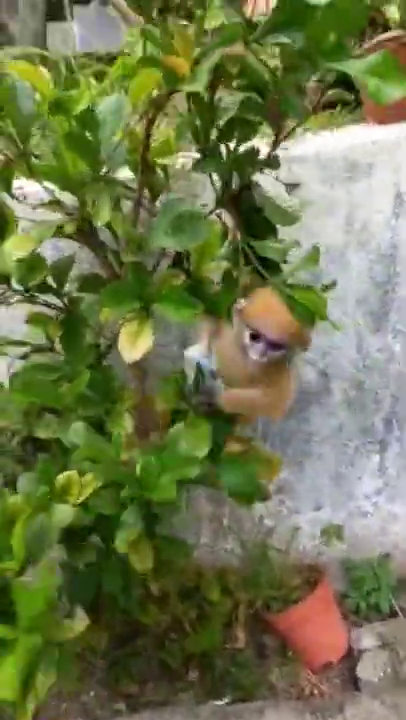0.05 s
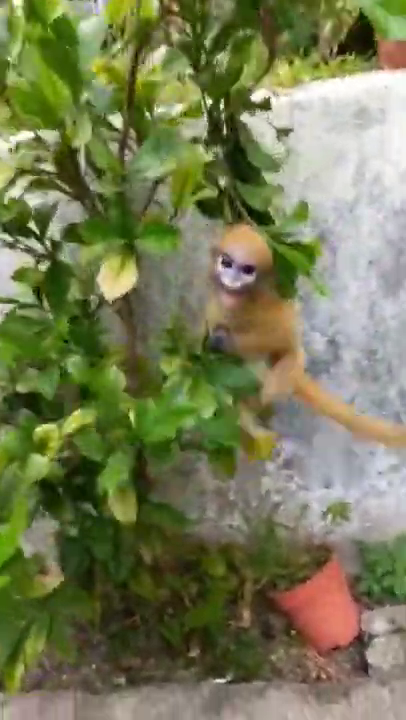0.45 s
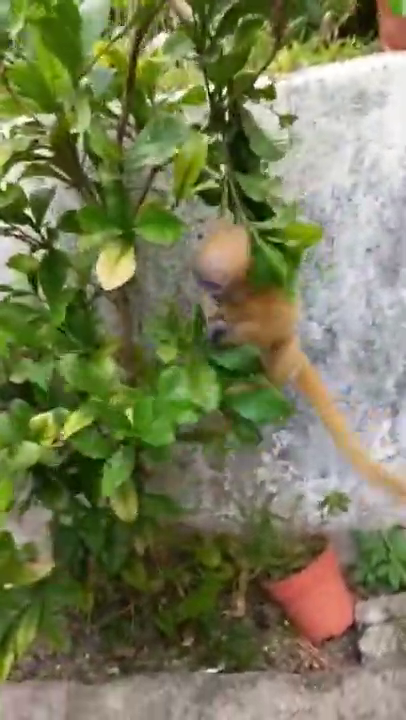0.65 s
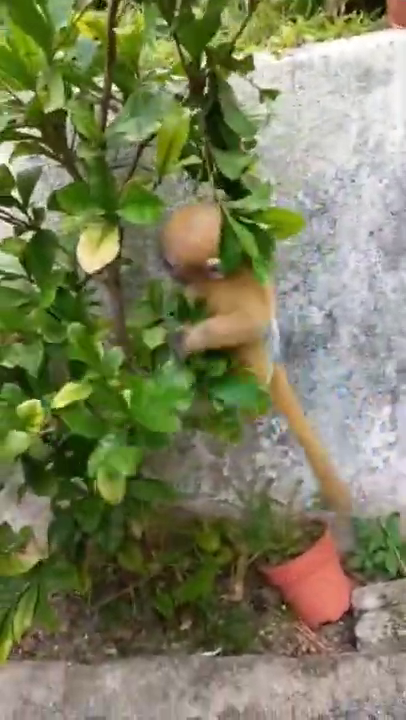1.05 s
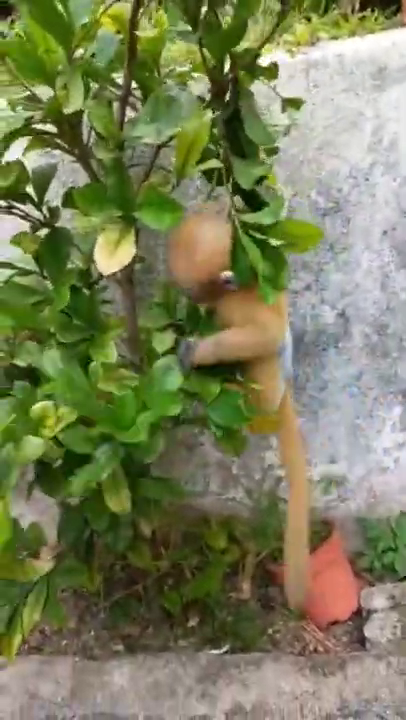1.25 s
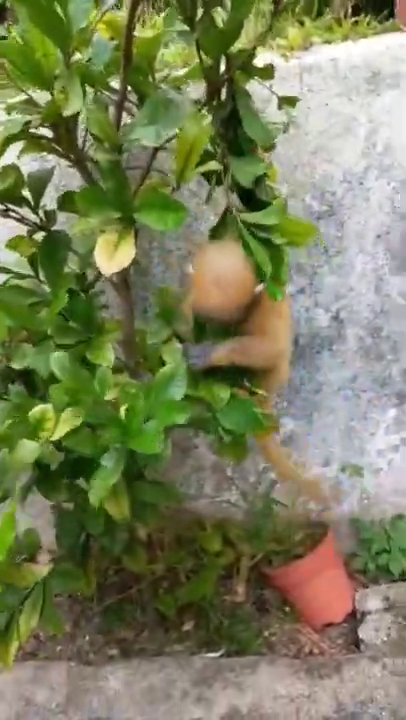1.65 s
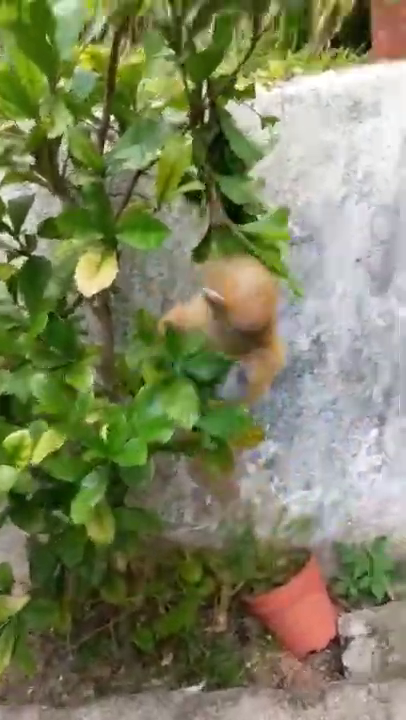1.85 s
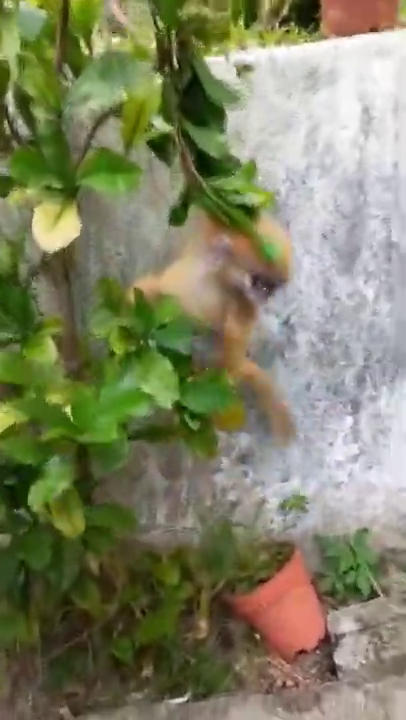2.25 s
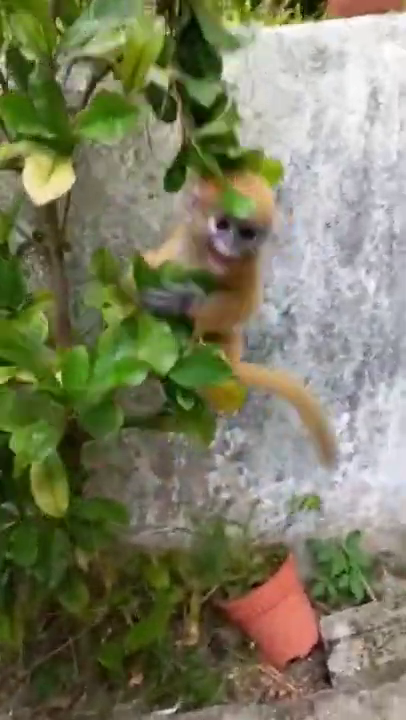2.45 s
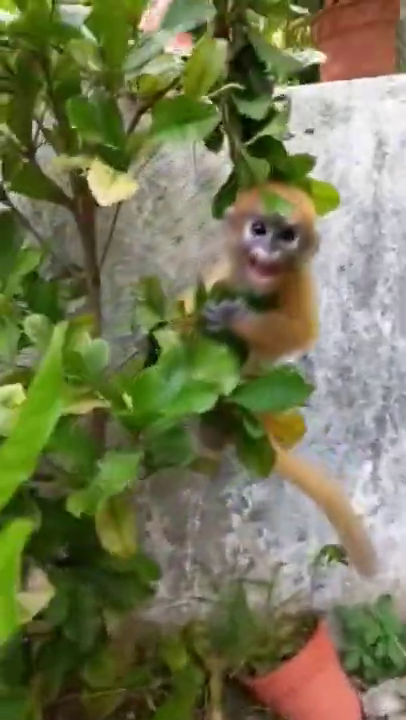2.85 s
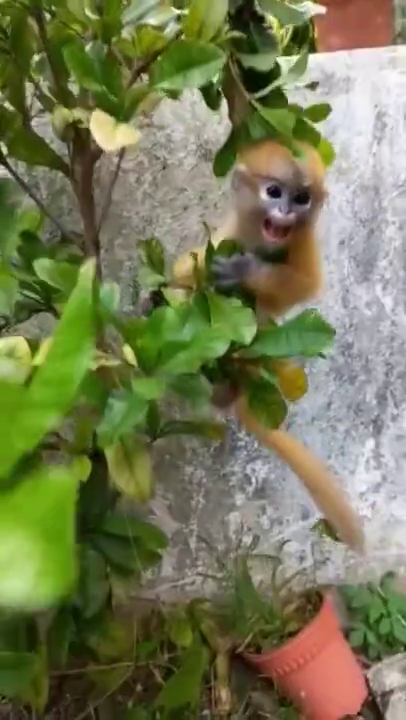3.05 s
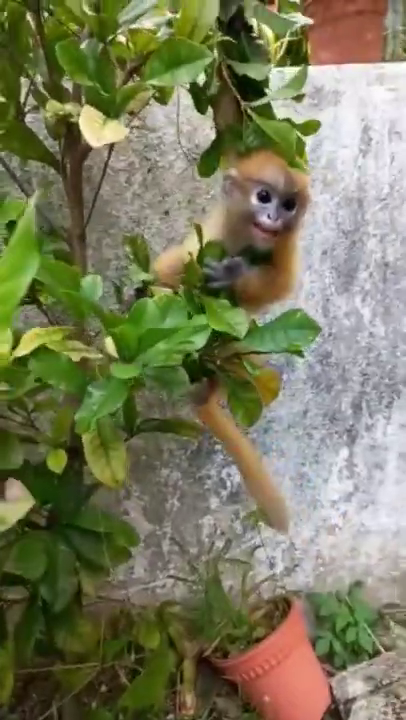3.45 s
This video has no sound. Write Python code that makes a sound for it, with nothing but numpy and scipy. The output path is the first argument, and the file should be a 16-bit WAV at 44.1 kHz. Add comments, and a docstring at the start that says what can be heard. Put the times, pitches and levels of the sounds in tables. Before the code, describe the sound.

A young monkey cries three times, quavering whines breaking into harsh shrieks over faint insects.

```python
"""Over far insect hiss and rustling leaves, a young monkey in a bush by a garden wall gives a clear whine
that rises, quavers and breaks into a harsh shriek and short yelps. One low grunt opens with a click.
A second cry runs like the first; the third stays a whine while air rumbles on the moving microphone,
and a faint yelp comes last. The voice is a source and filter: vocal-fold pulses and rasp excite
resonances of throat and mouth. The foliage scatters the cries, and the wall and ground reflect them."""
import sys
import numpy as np
from scipy import signal
from scipy.fft import rfft, irfft
from scipy.io import wavfile
from scipy.ndimage import uniform_filter1d

SR = 44100
rng = np.random.default_rng(int(sys.argv[2]) if len(sys.argv) > 2 else 0)


def wav_record(signal):
    """Record a signal, one row per channel, as 16-bit PCM in the file named by sys.argv[1]."""
    frames = np.transpose(np.atleast_2d(signal))
    bounded = np.clip(frames, -1, 1)
    # unit amplitude maps onto the largest positive 16-bit level
    quanta = np.round(bounded * 32767).astype(np.int16)
    wavfile.write(sys.argv[1], SR, quanta)


N = 154350
T = np.arange(N) / SR

# Spectral envelopes: f/Hz, relative level/dB
AIR_SPECTRUM = [(30, 13.5), (200, 9.5), (450, -9), (600, 3), (800, -18.5), (1450, -3), (2000, -17),
                (4000, -7.5), (6000, -18), (10000, -34), (15000, -23)]
INSECT_SPECTRUM = [(6300, -19), (7000, 30), (7600, 18.5), (8600, -64), (14200, 13)]
RUMBLE_SPECTRUM = [(25, -58), (42, -25), (62, -2), (110, -1), (160, -9), (250, -18), (400, -31),
                   (900, -45.5)]
RUSTLE_SPECTRUM = [(300, -1.5), (800, 2.5), (1400, -1.5), (3000, -7.5), (6000, -3), (10000, -5.5),
                   (15000, -2.5)]
GRUNT_SPECTRUM = [(120, -9), (530, 12), (800, -11.5), (1900, -17), (3000, -3), (4500, -16.5)]
# Frequency responses of foliage, throat, mouth and left port against right: f/Hz, gain/dB
SCATTER_RESPONSE = [(1000, -6), (3000, 3.5), (6000, 6), (12000, 8.5)]
THROAT_RESPONSE = [(500, 1.5), (900, -1), (1250, 2), (1750, 10.5), (2100, 13), (2500, 14), (2900, 5),
                   (3400, 3), (4100, -10), (5500, -42)]
MOUTH_RESPONSE = [(1500, -28.5), (3300, -21.5), (4300, -9), (5500, -4.5), (6700, -7.5), (7700, -2),
                  (8500, -4.5), (9700, -4), (11000, -1.5), (13000, 1), (15500, -1)]
LEFT_RESPONSE = [(100, 7.5), (1000, 1), (2500, -2.5), (5500, 3.5), (8000, 0), (10500, -3), (12500, -11.5),
                 (15000, -18.5)]
# Envelopes of air on the microphone, leaf rustle and sound by way of the foliage: t/s, relative level/dB
RUMBLE_LEVEL = [(0, -67), (.83, -49.5), (1.6, -66.5), (2.43, -52), (2.74, -37), (2.9, -50), (3.5, -55.5)]
RUSTLE_LEVEL = [(0, -55), (.8, -46), (1.05, -57.5), (1.6, -62), (2.7, -47.5), (3.4, -57)]
SCATTER_LEVEL = [(.4, -10.5), (.7, -9), (2.3, -5.5), (2.75, -16), (3.1, -10.5)]
# Soft bumps on the microphone: t/s, relative peak level/dB
HANDLING_BUMPS = [(.75, -63), (0.844, -48), (1.46, -53), (2.434, -46), (2.691, -35.5), (2.78, -31),
                  (3.111, -38.5), (3.298, -42.5)]
# The sharp click that opens the grunt, then two leaf ticks: t/s, peak level/dB
CLICKS = [(0.919, -35), (1.072, -46.5), (2.6, -43.5)]
# Earlier arrival at the left port: t/s, lead/ms
LEFT_LEAD = [(.5, 0.099), (2.2, 0.091), (2.9, 0.16)]
# Course of the grunt: t/s, f/Hz, level/dB
GRUNT_CONTOUR = [(.916, 137.8, -48), (0.936, 192, -41.5), (0.95, 273, -36.5), (0.968, 327, -47.5),
                 (1.001, 286, -63)]
# Yelps: onset t/s, duration/s, lowest f/Hz, roughness, throat level/dB, treble level/dB
YELP_EVENTS = [(0.674, 0.033, 1763, 1.09, -44, -22.5), (0.737, .032, 1970, 0.95, -50, -25),
               (0.817, 0.017, 2293, 1, -40, -25), (2.419, 0.011, 2010, 0.8, -36.5, -23.5),
               (2.477, 0.026, 1527, 0.77, -35, -23), (2.528, 0.022, 1697, 0.86, -43, -62),
               (3.471, 0.021, 687, 0.4, -47.5, -59)]
# Cries: t/s, f/Hz, quaver depth as a share of f, roughness (full at 1), throat level/dB, treble level/dB
FIRST_CRY = [(.07, 733, 0.0041, 0.3, -62, -62), (0.107, 674, 0.0069, 0.05, -47.5, -61),
             (0.178, 749, 0.0031, 0, -38.5, -48.5), (0.256, 813.6, 0.02, 0.13, -34.5, -45),
             (0.377, 874.5, 0.044, 0.21, -30, -36), (0.462, 923, 0.033, 0.09, -30.5, -26.5),
             (.508, 986.7, .03, 0.25, -32.5, -21.5), (.535, 1307, 0.069, 0.35, -36.5, -22.5),
             (.547, 1711, 0.088, 0, -34, -19), (0.559, 1951, 0.085, 0.42, -25.5, -20),
             (.567, 1551, .14, .95, -37, -27.5), (.58, 1944, 0.1273, 1, -30, -17),
             (.598, 2000, .18, 0.88, -33, -16.5), (0.629, 1907, .14, 1.03, -34.5, -26),
             (0.653, 2280, 0.127, 1.17, -37.5, -20.5)]
SECOND_CRY = [(1.665, 772, 0.0066, 0.093, -58.5, -64), (1.723, 764, 0.0047, 0.21, -46, -53.5),
              (1.812, 826, 0.018, 0.13, -49.5, -55), (1.902, 819.4, 0.011, 0.087, -41, -44.5),
              (2.017, 902, 0.039, 0.39, -39, -48), (2.035, 921, .045, 0.38, -38.5, -29),
              (2.08, 1048, .06, 0.25, -35.5, -37), (2.111, 1084, .07, 0.25, -34, -27.5),
              (2.127, 1250, .08, 0.37, -38.5, -25.5), (2.136, 1719, .15, 0.86, -40.5, -31),
              (2.17, 1618, .2, 0.69, -32, -25.5), (2.2, 1830, .22, 0.91, -34, -27),
              (2.235, 1742, .22, 0.61, -35, -25), (2.299, 1880, .18, 0.92, -34.5, -25.5),
              (2.373, 2084, .09, 0.3, -32.5, -25)]
THIRD_CRY = [(2.665, 768, 0.0041, 0.33, -59, -60), (2.7, 792, 0.0037, 0.24, -41.5, -34),
             (2.75, 824, 0.016, 0.062, -36, -28), (2.803, 908, 0.046, 0.086, -33, -26.5),
             (2.871, 886.6, 0.053, 0.096, -32.5, -22), (2.93, 980, 0.068, 0.26, -35, -22),
             (2.999, 977, 0.051, 0.26, -34.5, -25), (3.067, 1038, 0.0578, 0.25, -37.5, -22.5),
             (3.169, 1051, 0.092, 0.16, -35, -25.5), (3.225, 1001, 0.091, 0.48, -36, -26),
             (3.256, 984, 0.073, 1, -54, -50)]
# Manner of each cry: t/s of one pitch trough, quaver rate there/Hz, its rise/(Hz/s),
# mouth resonance f/Hz, its gain/dB, treble tilt/(dB/octave), upper throat resonance gain/dB
CRY_MANNERS = [(.569, 15.7, 12.5, 5570, -1.5, -2.5, 0), (2.236, 15.4, 9, 4090, 7.5, 0.5, -2.5),
               (2.968, 14.8, -0.5, 5280, 4.5, 3, -8)]

CUTOFF_HZ = 15550


def from_db(db):
    """Amplitude ratio of a level: 20 dB to a factor of ten."""
    return 10 ** (np.asarray(db) / 20)


def rms_one(x):
    """Normalisation to unit rms."""
    return x / np.sqrt(np.mean(x ** 2) + 1e-20)


def hold_level(x):
    """Division by the running rms holds the level steady."""
    return x / np.sqrt(np.abs(uniform_filter1d(x * x, size=500)) + 1e-9)


def curves(rows, t):
    """Linear interpolation of each column in time."""
    times, *columns = np.transpose(rows)
    return [np.interp(t, times, column) for column in columns]


def colour(x, points):
    """Minimum-phase filtering: folding the cepstrum makes an outline (f/Hz, gain/dB) causal."""
    hz, db = np.transpose(points)
    size = 4096
    f = np.maximum(np.arange(size // 2 + 1) * SR / size, 1)
    bass_rolloff_db = 40 * np.log10(np.minimum(f / hz[0], 1) + .01)
    gain = from_db(np.interp(np.log(f), np.log(hz), db) + bass_rolloff_db)
    cepstrum = irfft(np.log(gain))
    cepstrum[1:size // 2] *= 2
    cepstrum[size // 2 + 1:] = 0
    return signal.fftconvolve(x, irfft(np.exp(rfft(cepstrum))))[:len(x)]


def resonate(x, hz, q, db):
    """A second-order resonance raises or lowers one band."""
    return x + (from_db(db) - 1) * signal.lfilter(*signal.iirpeak(hz, q, fs=SR), x)


def drift(rate_hz, size=N):
    """Low-pass filtered noise: a smooth random wander of unit rms."""
    pole = np.exp(-2 * np.pi * rate_hz / SR)
    white = rng.standard_normal(size + SR // 4)
    return rms_one(signal.lfilter([1], [1, -2 * pole, pole * pole], white)[-size:])


def noise(spectrum):
    """Spectrally shaped noise of unit rms."""
    return rms_one(colour(rng.standard_normal(N), spectrum))


def outdoor_air():
    """Steady ambient noise, largely coherent between the two ports."""
    mid, side = noise(AIR_SPECTRUM), .11 * noise(AIR_SPECTRUM)
    return from_db(-61.5) * np.array([mid + side, mid - side])


def insects():
    """Far insects: narrow-band noise under random amplitude modulation."""
    return np.array([from_db(db - drift(32)) * noise(INSECT_SPECTRUM) for db in (-58.5, -62.5)])


def microphone_rumble():
    """Moving air and soft handling bumps give low pressure fluctuations, incoherent between the ports."""
    bump_s = .014
    bumps = sum(from_db(db) * np.exp(-((T - s) / bump_s) ** 2) for s, db in HANDLING_BUMPS)
    envelope = from_db(curves(RUMBLE_LEVEL, T)[0]) + bumps
    return np.array([from_db(db) * envelope * noise(RUMBLE_SPECTRUM) for db in (7.5, 5)])


def rustle_and_clicks():
    """Amplitude-modulated noise: leaves rustle; the grunt's opening click and two leaf ticks decay."""
    flutter_db, decay_s = 2.5, .0073
    envelope = from_db(curves(RUSTLE_LEVEL, T)[0] + flutter_db * drift(40))
    for s, db in CLICKS:
        envelope += from_db(db) * (T >= s) * np.exp(-np.abs(T - s) / decay_s)
    return envelope * np.array([noise(RUSTLE_SPECTRUM), noise(RUSTLE_SPECTRUM)])


def reflections(db, t60_s, delay_s=0):
    """Impulse response of diffuse reflection: exponentially decaying noise."""
    t = T[:SR // 2]
    spray = rng.standard_normal(len(t)) * from_db(-60 * t / t60_s) * (t > delay_s)
    return from_db(db) * spray / np.linalg.norm(spray)


def garden(x):
    """Scattering by foliage, shifting as head and leaves move, and reflection from wall and ground."""
    sway_radians = 2.5 * drift(4)
    scattered = 0
    for share in (np.cos(sway_radians), np.sin(sway_radians)):
        path = colour(reflections(db=0, t60_s=.012), SCATTER_RESPONSE)
        scattered += share * signal.fftconvolve(x, path)[:N]
    echoes = signal.fftconvolve(x, reflections(db=-7, t60_s=.077, delay_s=.00181))[:N]
    return from_db(curves(SCATTER_LEVEL, T)[0]) * scattered + echoes


def utterance(start, end, attack_s=.004, release_s=.0058):
    """Sample indices, times and attack-release envelope of one call."""
    i = np.arange(int((start - attack_s) * SR), min(N, int((end + release_s) * SR)))
    t = i / SR
    attack = np.clip((t - start) / attack_s + 1, 0, 1)
    release = np.clip((end - t) / release_s + 1, 0, 1)
    return i, t, (attack * release) ** 2


def vocal_folds(hz, rough, rasp_floor=0):
    """Glottal source, a cleaner and a raspier form: roughness adds jitter, subharmonics and noise."""
    size, rough = len(hz), np.clip(rough, 0, 1)
    jitter = .04 * rough * drift(520, size)
    wobble = .00723 * drift(60.7, size)
    phase = 2 * np.pi * np.cumsum(hz * (1 + jitter + wobble)) / SR
    pulses = 0
    for k in range(1, 24):
        flutter_db = 2.2 * min(k / 8, 1) * drift(45, size)
        band_limit = np.clip((CUTOFF_HZ - k * hz) / hz + 1, 0, 1)
        pulses += from_db(flutter_db) * np.cos(k * phase) * band_limit
    pulses = hold_level(pulses) * (1 + .24 * rough * np.cos(phase / 2))  # strong and weak alternate
    rasp = hold_level(rng.standard_normal(size) * (1 + np.cos(phase)) ** 2)  # one puff per cycle
    rasp = signal.sosfilt(signal.butter(4, min(hz.max(), 1400), "high", fs=SR, output="sos"), rasp)
    rasp_shares = np.clip([.75 * rough, np.hypot(rough, rasp_floor)], 0, .97)
    return [pulses * np.sqrt(1 - share ** 2) + .68 * share * rasp for share in rasp_shares]


def voice(hz, rough, throat_db, treble_db, mouth_hz, mouth_db, tilt_db, upper_throat_db=0, top_db=0):
    """Source and filter: cleaner pulses excite the throat formants, raspier ones the bright mouth."""
    clean, rasped = vocal_folds(hz, rough, rasp_floor=.42)
    throat = hold_level(resonate(colour(clean, THROAT_RESPONSE), hz=2600, q=2.9, db=upper_throat_db))
    tilted = [(f, db + tilt_db * np.log2(f / mouth_hz)) for f, db in MOUTH_RESPONSE]
    treble = hold_level(resonate(colour(rasped, tilted), mouth_hz, q=4.6, db=mouth_db))
    top = signal.sosfiltfilt(signal.butter(2, 8400, "high", fs=SR, output="sos"), treble)
    treble += (from_db(top_db) - 1) * top
    grain_db = 2 * np.sqrt(np.abs(rough)) * drift(180, len(hz))  # a rough treble flutters
    return from_db(throat_db) * throat + from_db(treble_db + grain_db) * treble


def grunt():
    """Slow, rough glottal pulses excite one strong low formant."""
    out = np.zeros(N)
    i, t, gate = utterance(GRUNT_CONTOUR[0][0], GRUNT_CONTOUR[-1][0])
    hz, db = curves(GRUNT_CONTOUR, t)
    _, rasped = vocal_folds(hz, rough=.55)
    out[i] = gate * from_db(db) * hold_level(colour(rasped, GRUNT_SPECTRUM))
    return out


def yelps():
    """Short bursts of rough phonation, each with a U-shaped glide of the fundamental."""
    out = np.zeros(N)
    for start, length, hz, rough, throat_db, treble_db in YELP_EVENTS:
        i, t, gate = utterance(start, start + length, attack_s=.012)
        bend = np.minimum((2 * (t - start) / length - 1) ** 2, 1)
        out[i] += gate * voice(hz * (1 + .27 * bend), rough, throat_db, treble_db,
                               mouth_hz=5830, mouth_db=3, tilt_db=-1.5)
    return out


def cries():
    """Coupled frequency and amplitude modulation: rising whines, brighter and rougher in each trough."""
    out = np.zeros(N)
    full_swell_depth = .076
    for rows, manner in zip([FIRST_CRY, SECOND_CRY, THIRD_CRY], CRY_MANNERS):
        trough_s, rate_hz, rise_hz_per_s, *tract = manner
        i, t, gate = utterance(rows[0][0], rows[-1][0])
        hz, depth, rough, throat_db, treble_db = curves(rows, t)
        since = t - trough_s
        quaver = np.cos(2 * np.pi * (rate_hz * since + rise_hz_per_s * since ** 2 / 2))
        dip = quaver + 1.55 * depth * (2 * quaver ** 2 - 1)  # round crests, sharp troughs
        swell = quaver * np.clip(depth / full_swell_depth, 0, 1)  # positive in a pitch trough
        out[i] += gate * voice(hz * (1 - depth * dip), rough * (1 + .34 * swell),
                               throat_db - 2.5 * swell, treble_db + swell, *tract,
                               top_db=5.5 * (swell - .5))
    return out


def scene():
    """Superposition at two microphone ports: cries and yelps reach the left first, but duller."""
    right = cries() + yelps()
    dulled = colour(right, LEFT_RESPONSE)
    lead_s = curves(LEFT_LEAD, T)[0] / 1000
    fine_t = np.arange(4 * N) / (4 * SR)  # oversampled for a shift finer than one sample
    left = np.interp(T + lead_s, fine_t, signal.resample(dulled, len(fine_t)))
    calls = np.array([left + garden(dulled), right + garden(right)])
    return calls + grunt() + rustle_and_clicks() + outdoor_air() + insects() + microphone_rumble()


def record(dry):
    """Band limiting: the deep bass is rolled off and the top is cut steeply."""
    thinned = signal.sosfilt(signal.butter(4, 48, "high", fs=SR, output="sos"), dry)
    return signal.sosfilt(signal.ellip(12, .2, 80, CUTOFF_HZ, fs=SR, output="sos"), thinned)


dry = scene()
out = record(dry)
wav_record(out)
```